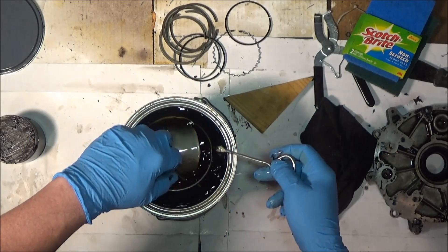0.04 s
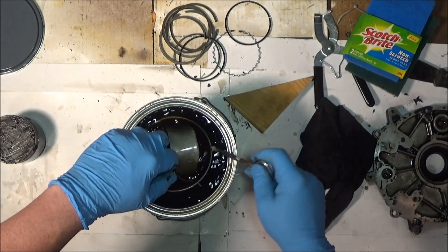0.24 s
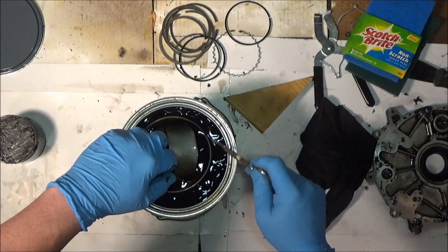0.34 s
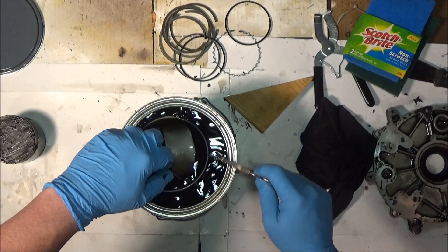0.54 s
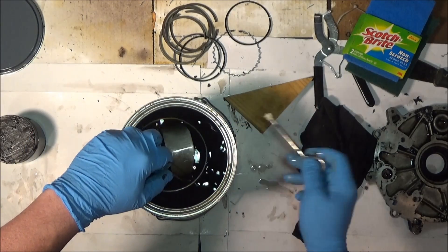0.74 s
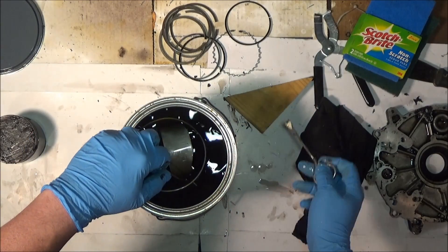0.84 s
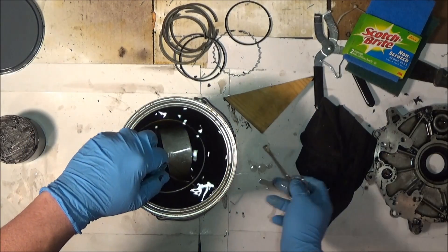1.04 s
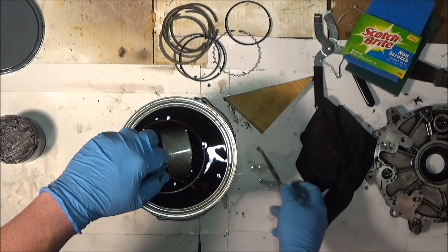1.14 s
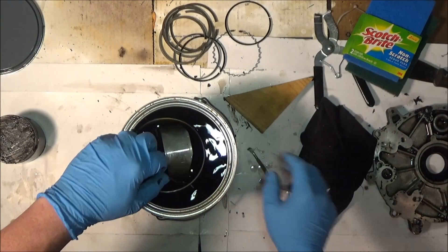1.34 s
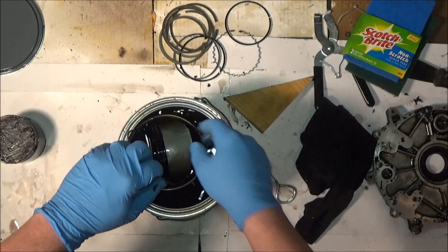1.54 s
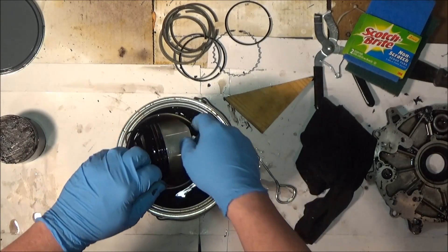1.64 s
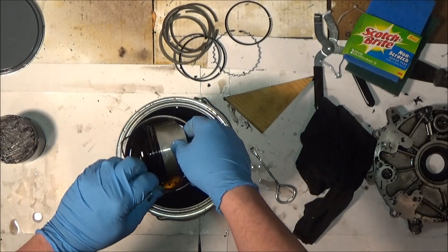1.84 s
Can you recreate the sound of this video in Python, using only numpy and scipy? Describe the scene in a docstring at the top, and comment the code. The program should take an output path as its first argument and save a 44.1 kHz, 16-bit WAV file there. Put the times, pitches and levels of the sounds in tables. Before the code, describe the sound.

A metal brush handle raps three times on a tin, then a piston knocks dully inside.

```python
"""A wire-handled brush is rapped three times on the rim of a tin of oil, chattering as it lands.
Each hit makes the thin metal clash and ring. The brush is laid on the bench with light ticks and a ping.
Then a piston is turned in the tin and bumps its wall: dull knocks, each with a small metal tick.
Rubber gloves rustle as they slide on metal. It is all heard from above the bench in a small workshop."""
import sys
import numpy as np
from scipy import signal
from scipy.io import wavfile

SR = 44100
rng = np.random.default_rng(int(sys.argv[2]) if len(sys.argv) > 2 else 0)


def wav_out(sig):
    """Save sig, one row per channel (or a flat mono array), as 16-bit PCM at SR to the path in sys.argv[1]."""
    wavfile.write(sys.argv[1], SR, np.round(np.clip(np.atleast_2d(sig).T, -1, 1) * 32767).astype(np.int16))


N = 83790
AGE = np.arange(SR // 2) / SR  # seconds since a hit

# Hits and bounces of the handle, levels relative:
# (time [s], ring [dB], clash [dB], bass [dB], treble [dB])
RAPS = [(.2389, 0, -1.5, 2.5, 2.5), (.2592, -4, 8, -1, -14.5), (.2838, -2, -0.5, 0, -3.5),
        (.2957, -13, -5, 11.5, -2.5), (.4826, -3.5, 3.5, 6, -3), (.6009, 0, 4.5, 1, -3),
        (.6180, -34, 5, -1, -5.5), (.6290, -4, 3, 7.5, -7), (.6375, -14, -2, 2, -11)]
# The notes of handle and rim, one list each: (pitch [Hz]), (relative level [dB]), (ring time [s])
RIM_HZ = [335, 362, 583, 660, 1040, 1168, 1600, 2025, 2120, 2240, 2580, 2848, 3267, 3290, 3885, 4250, 4430,
          5582, 5670, 7294, 7345, 7740, 9205, 10330]
RIM_LEVELS_DB = [-22, -27, -19, -18, -16, -12, -15, -4, -3, -8, -6, -9, -6, -5, -10, -12, -15, 1, -7, 2, -2,
                 -6, 0, -7]
RIM_RING_S = [.4, .95, .3, .25, .2, .27, .24, .19, .25, .2, .3, .17, .25, .25, .21, .2, .24, .18, .16, .19,
              .2, .19, .17, .14]
# The bright clash of thin metal: (frequency [Hz], gain [dB])
CLASH_TONE = [(60, -26), (130, -4), (210, -14), (320, -15.5), (650, -8.5), (880, -11.5), (1120, -1),
              (1450, -2.5), (2150, 0), (4800, 2), (5600, 4), (6400, -3), (7400, 11.5), (9000, 7),
              (11300, 2), (12300, -14), (14700, -8.5), (16500, -42)]
def brush_raps(rim_db=-19, crash_db=4, clash_s=.026):
    """The handle clashes on the rim and both ring on; each bounce shakes the metal in much the same way."""
    ringing, clash = np.zeros((2, N))
    shared_clash = burst(clash_s) + amp(-6.5) * click()
    for start, ring_db, clash_db, bass_db, treble_db in RAPS:
        tilt = [(900, bass_db), (3100, 0), (8650, treble_db)]
        notes = ring(zip(RIM_HZ, RIM_LEVELS_DB, RIM_RING_S), tilt)
        add(ringing, start, amp(rim_db + ring_db) * notes)
        this_clash = shared_clash + amp(-4) * burst(clash_s)
        add(clash, start, amp(crash_db + clash_db) * colour(this_clash, tilt))
    return spread(ringing) + room(colour(clash, CLASH_TONE), echo_db=-.5)


# Bumps of the piston, levels relative:
# (time [s], thud and ring [dB], extra ring [dB], bass [dB], middle [dB], upper [dB], tick [dB])
KNOCKS = [(1.1793, 0.5, 0, 1, 2.5, -9.5, -2.5), (1.2355, -11, 7.5, -3, -4, 1, -15),
          (1.2740, 2, 0.5, -6.5, 3.5, 5.5, -6), (1.2894, 0.5, -12, -5, 8, 2.5, -31),
          (1.2983, -3, 1.5, -2.5, -1, 6.5, -22), (1.3062, -11, -1.5, 4, 8.5, 1, -25),
          (1.3227, -12, -7, 2, 9, 6, -27), (1.3328, -15, 1.5, 1.5, -5, 12.5, -17.5),
          (1.3490, -0.5, 0, -5.5, 3, 1, -9.5), (1.36, -12, 0.5, 4.5, 8, 6, -23),
          (1.3850, -13, 3, 2, -1, 10.5, -16), (1.4300, -17, -4, 4, -3, 1.5, -43),
          (1.4762, -9, 0, 0.5, 3, 15, -3.5), (1.492, -12.5, -5.5, 7.5, 4.5, -8, -31),
          (1.5220, -12.5, -1, 3.5, 4, 12.5, -31), (1.5665, -13, 3.5, 2, 8.5, 6, -14.5),
          (1.5955, -15, 3, 2, -1, 9, -27.5), (1.6117, -19.5, 6.5, -7.5, 5.5, 7.5, -19.5)]
# The notes of the oil-filled tin, one list each: (pitch [Hz]), (relative level [dB]), (ring time [s])
TIN_HZ = [72, 120, 170, 335, 408, 505, 581, 725, 873, 938, 991, 1127, 1250, 1340, 1529, 2330]
TIN_LEVELS_DB = [-15.5, -15, -17.5, -6, -9, -12, -2, -10.5, -13.5, -7.5, -11.5, -3.5, -10.5, -12.5, -11.5,
                 -20]
TIN_RING_S = [0.15, 0.175, 0.21, 0.6, 0.22, 0.32, 0.23, 0.095, 0.12, 0.05, 0.057, 0.2, 0.13, 0.2, 0.084,
              0.13]
# The faint ring of the piston itself: (pitch [Hz], relative level [dB], ring time [s])
PISTON_NOTES = [(2480, -54, 0.31), (5630, -42, 0.14)]
# The dull body of a knock: (frequency [Hz], gain [dB])
THUD_TONE = [(25, -40), (65, -25), (160, 12), (280, -9), (340, 7.5), (580, 9.5), (800, 6.5), (1150, 3.5),
             (1700, -0.5), (2400, -8.5), (3600, -16), (8000, -48), (16000, -63)]
# The tick of metal meeting metal: (frequency [Hz], gain [dB])
TICK_TONE = [(100, -17), (1500, -6), (3000, 2), (4500, -1.5), (6500, 1), (9500, 3), (11500, -11),
             (16000, -25)]
def piston_knocks(tin_db=-17.5, thud_db=8, metal_db=5.5):
    """The piston ticks on the wall of the tin, which answers with a muffled clunk."""
    ringing, thud, tick = np.zeros((3, N))
    # The tin booms hardest at first, until oil and hand calm it.
    boom = 1 + amp(4.5) * np.exp(-(AGE / .01) ** 2)
    next_starts = [row[0] for row in KNOCKS[1:]] + [N / SR]
    for knock, next_start in zip(KNOCKS, next_starts):
        start, db, ring_db, bass_db, middle_db, upper_db, tick_db = knock
        tilt = [(506, bass_db), (1105, middle_db), (2050, upper_db)]  # each spot has its own tone
        # Each new bump stops the ringing of the one before.
        choke = fade(np.maximum(start + AGE - next_start, 0), ring_s=.033)
        notes = ring(zip(TIN_HZ, TIN_LEVELS_DB, TIN_RING_S), tilt)
        add(ringing, start, amp(tin_db + db + ring_db) * notes * boom * choke)
        add(ringing, start, amp(tick_db) * ring(PISTON_NOTES) * choke)
        add(thud, start, amp(thud_db + db) * colour(burst(ring_s=.025), tilt))
        contact = .39 * burst(ring_s=.01) + 1.15 * click()
        add(tick, start, amp(metal_db + tick_db) * contact)
    return (spread(ringing)
            + room(colour(thud, THUD_TONE), echo_db=3)
            + room(colour(tick, TICK_TONE), echo_db=-4.5))


# Light touches as the brush is put down, levels relative: (time [s], tick [dB], ping [dB])
TOUCHES = [(0.798, -29, -78), (.8450, -22, -80), (.9510, -17.5, -82), (0.955, -15, -72), (1.0810, -24, -36),
           (1.162, -24, -69)]
def brush_laid_down(ping_hz=2377, ping_s=.079):
    """The brush ticks lightly, with a short ping as it meets the bench."""
    touches = np.zeros(N)
    for start, tick_db, ping_db in TOUCHES:
        tick = amp(tick_db) * colour(burst(ring_s=.01), TICK_TONE)
        ping = amp(ping_db) * ring([(ping_hz, 0, ping_s)])
        add(touches, start, tick + ping)
    return room(touches, echo_db=-10)


# Rubs of the gloves: (time [s], length [s], level [dB])
RUBS = [(-.1, 0.37, -45), (0.95, 0.047, -48), (1.04, 0.1, -58), (1.691, 0.15, -47.5), (1.788, 0.11, -42.5)]
# The rustle of rubber: (frequency [Hz], relative level [dB])
GLOVE_TONE = [(60, -1), (200, -12), (320, 2.5), (450, 1), (850, -4.5), (1200, 3.5), (1650, -9), (2000, 2),
              (2300, 5), (2800, -4.5), (6000, -8.5), (9500, -7), (12500, -16), (16000, -28)]
def glove_rustle(grain_db=2.5, grain_s=.003):
    """Rubber slides on metal, making a grainy noise that swells and fades with each rub."""
    t = np.arange(N) / SR
    grain_times = np.arange(0, 2, grain_s)
    grain = amp(grain_db * np.interp(t, grain_times, rng.standard_normal(len(grain_times))))
    rustle = colour(rng.standard_normal(N) * grain, GLOVE_TONE)
    swell = np.zeros(N)
    for start, length, db in RUBS:
        progress = np.clip((t - start) / length, 0, 1)
        swell += amp(db) * np.sqrt(abs(np.sin(np.pi * progress)))
    return spread(rustle / rustle.std() * swell)


# The hush of the workshop: (frequency [Hz], relative level [dB])
AIR_TONE = [(20, -30), (45, -17), (70, 5), (150, 0.5), (350, -1.5), (450, -5), (900, -10), (1170, -5.5),
            (1600, -10.5), (2200, -11.5), (3200, -11), (5000, -17), (9300, -16.5), (16000, -29)]
def workshop_air(level_db=-49):
    """The air makes a quiet, steady noise, strongest in the bass."""
    middle, side = (colour(rng.standard_normal(N), AIR_TONE) for _ in range(2))
    return amp(level_db) * stereo(middle, side) / middle.std()


# How long the workshop echoes: (frequency [Hz], ring time [s])
ROOM_RING = [(100, 0.2), (400, 0.4), (1200, 0.34), (3000, 0.29), (8000, 0.21), (14000, 0.097)]
def echo_tail(build_up_s=.0056):
    """Countless echoes blur into one tail, whose treble dies first."""
    hz, t, spectrum = signal.stft(rng.choice([-1., 1.], len(AGE)), SR, nperseg=256)
    spectrum = spectrum * fade(t, read_curve(ROOM_RING, hz)[:, None])
    tail = signal.istft(spectrum, SR)[1][:len(AGE)]
    tail *= 1 - np.exp(-(AGE / build_up_s) ** 2)
    return tail / np.linalg.norm(tail)


# Echoes off the bench and nearby walls: (delay [s], level [dB])
CLOSE_ECHOES = [(.0027, 3), (.0043, -30), (.0062, -6.5)]
def room(sound, echo_db):
    """A sound arrives directly, then as close echoes and a tail whose level is echo_db."""
    middle = amp(echo_db) * echo_tail()
    middle[0] += 1  # the direct sound
    for delay, db in CLOSE_ECHOES:
        add(middle, delay, amp(db) * burst(ring_s=.0011)[:SR // 100])
    side = amp(echo_db) * echo_tail() + .53 * burst(ring_s=.01)
    return stereo(signal.fftconvolve(sound, middle)[:N], signal.fftconvolve(sound, side)[:N])


def spread(sound):
    """An object sends a slightly different sound to each side."""
    side = amp(-2.5) * signal.fftconvolve(sound, burst(ring_s=.004))[:N]
    return stereo(sound, side)


# How wide the sound is between left and right: (frequency [Hz], side gain [dB])
STEREO_WIDTH = [(60, -22.5), (250, -17), (600, -10), (2500, -6.5), (5000, -8), (9000, -11.5), (16000, -30)]
def stereo(middle, side):
    """Two close microphones share the middle sound; the side sound sets left apart from right."""
    side = colour(side, STEREO_WIDTH)
    return np.array([middle + side, middle - side])


def ring(notes, tilt=((0, 0),)):
    """Struck metal rings with clear, fading notes; the tilt curve makes some louder than others."""
    sound = np.zeros(len(AGE))
    for hz, db, ring_s in notes:
        onset = 1 - np.exp(-(2 * AGE * hz) ** 2)  # builds up within one vibration
        wave = np.sin(2 * np.pi * (hz * AGE + rng.random()))
        sound += amp(db + read_curve(tilt, hz)) * fade(AGE, ring_s) * onset * wave
    return sound


def burst(ring_s):
    """Many crowded notes die away together, heard as a puff of noise."""
    noise = rng.standard_normal(len(AGE)) * fade(AGE, ring_s)
    return noise / np.linalg.norm(noise)


def click():
    """The first instant of contact, one sample long."""
    return signal.unit_impulse(len(AGE))


def fade(t, ring_s):
    """A smooth fade that falls by 60 dB in the ring time."""
    return 1e-3 ** (t / np.maximum(ring_s, 1e-3))


def colour(sound, curve):
    """Turns bass, middle and treble up or down along a curve of (frequency [Hz], gain [dB])."""
    hz = abs(np.fft.fftfreq(4096, 1 / SR))
    log_gain = np.log(amp(read_curve(curve, hz)))
    spectrum = np.exp(np.conj(signal.hilbert(log_gain)))  # so nothing sounds before the hit
    response = np.fft.ifft(spectrum).real
    return signal.fftconvolve(sound, response[:len(response) // 2])[:len(sound)]


def read_curve(curve, hz):
    """The value of a curve at a frequency, with octaves evenly spaced."""
    frequencies, values = np.transpose(curve)
    return np.interp(np.log(hz + 1), np.log(frequencies + 1), values)


def add(mix, start, sound):
    """Mixes a sound in at a start time in seconds."""
    part = mix[max(round(start * SR), 0):][:len(sound)]
    part += sound[:len(part)]


def amp(db):
    """Turns decibels into a number to multiply by."""
    return 10 ** (np.asarray(db) / 20)


def scene():
    """Brush, piston and gloves over the quiet air of the workshop."""
    return brush_raps() + piston_knocks() + brush_laid_down() + glove_rustle() + workshop_air()


def record(dry):
    """Rounds off the loudest peaks, then removes the very highest treble."""
    ceiling, cutoff_hz = .9, 16000
    rounded = dry / (1 + (dry / ceiling) ** 4) ** .25
    treble_cut = signal.firwin(255, cutoff_hz, window=("kaiser", 8), fs=SR)
    return signal.oaconvolve(rounded, treble_cut[None], "same")


dry = scene()
out = record(dry)
wav_out(out)
```